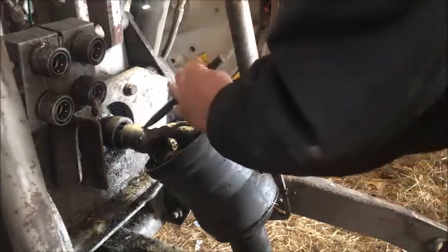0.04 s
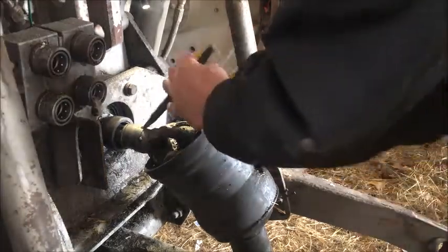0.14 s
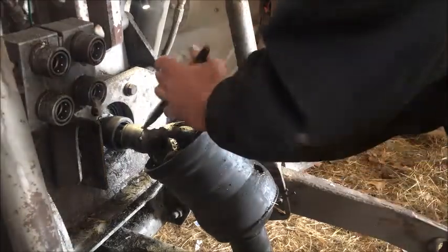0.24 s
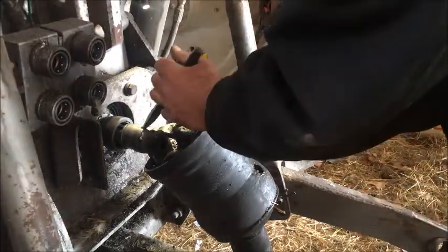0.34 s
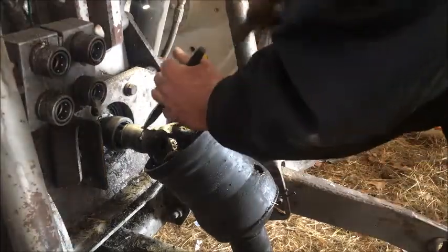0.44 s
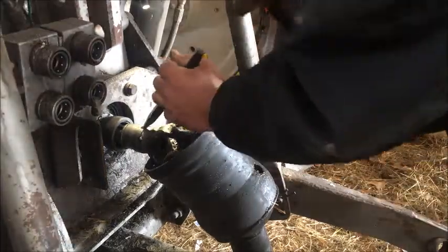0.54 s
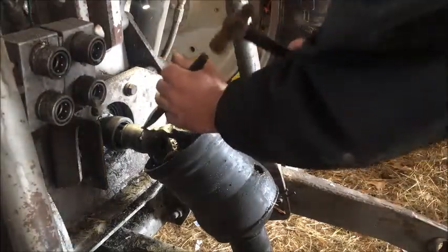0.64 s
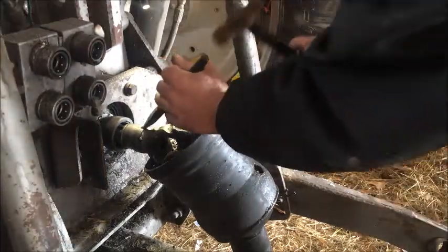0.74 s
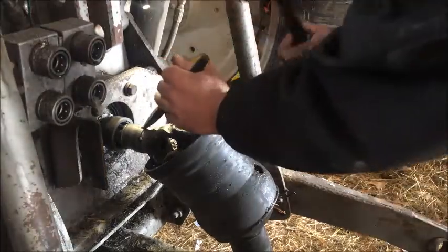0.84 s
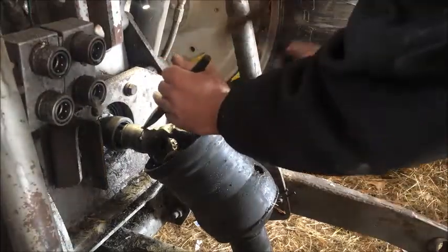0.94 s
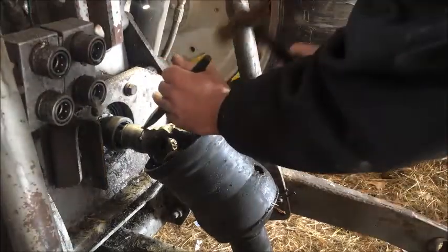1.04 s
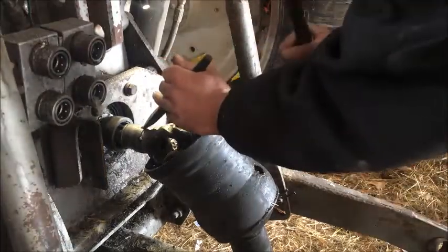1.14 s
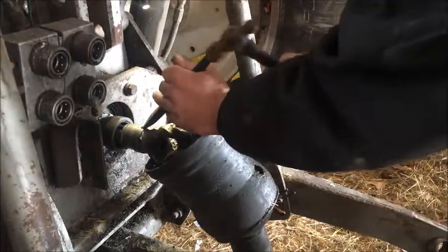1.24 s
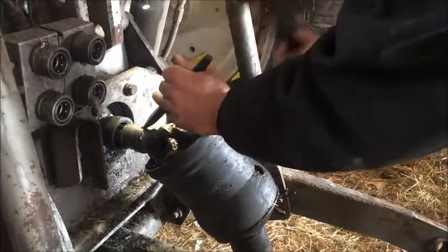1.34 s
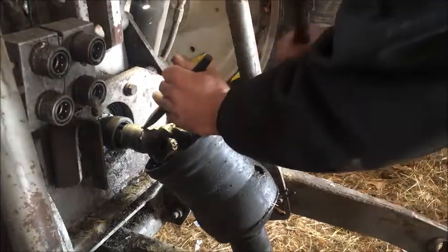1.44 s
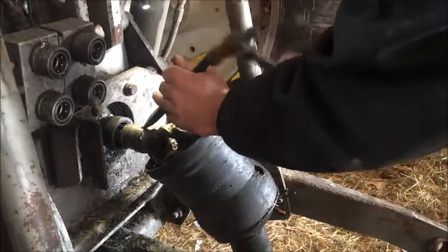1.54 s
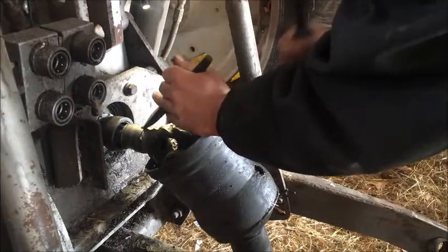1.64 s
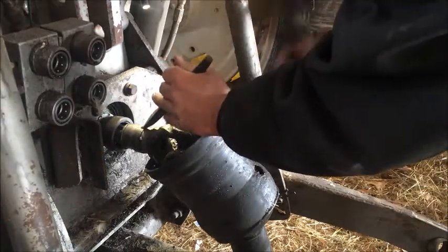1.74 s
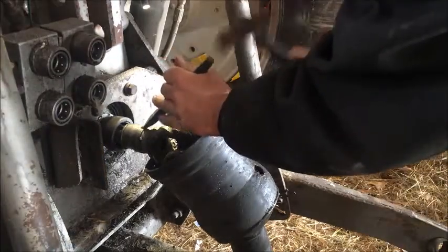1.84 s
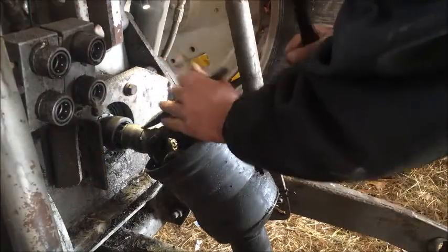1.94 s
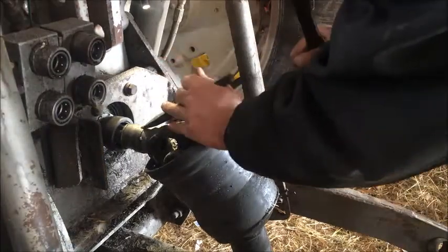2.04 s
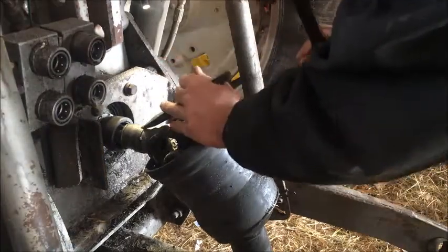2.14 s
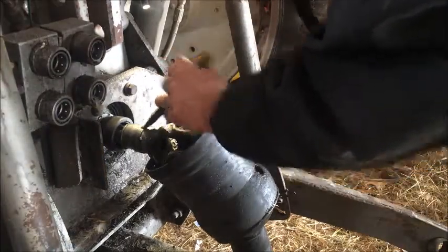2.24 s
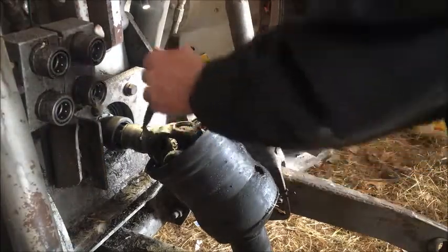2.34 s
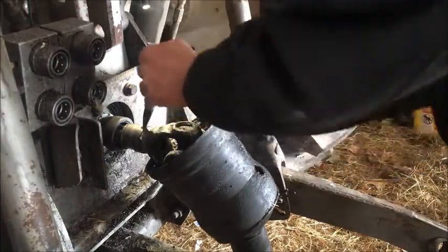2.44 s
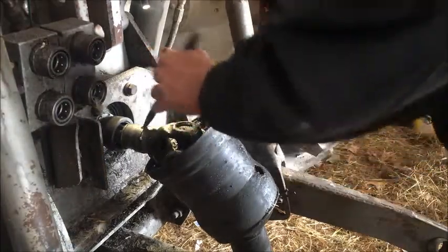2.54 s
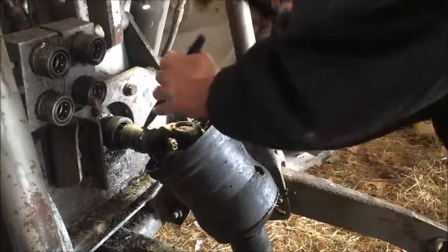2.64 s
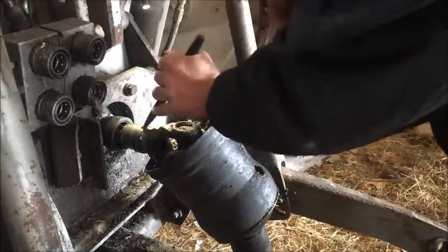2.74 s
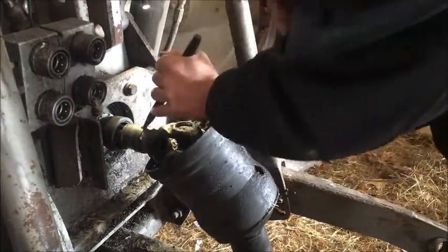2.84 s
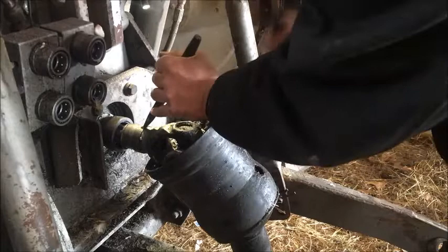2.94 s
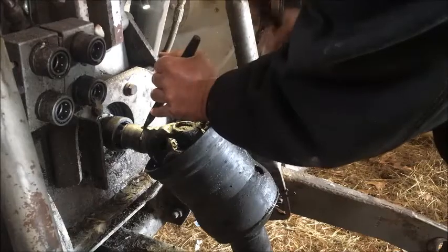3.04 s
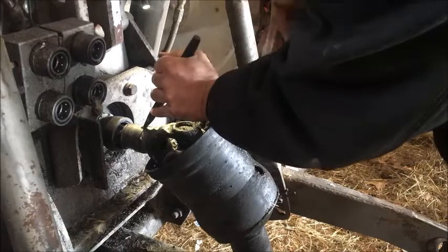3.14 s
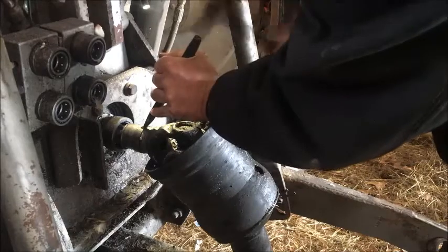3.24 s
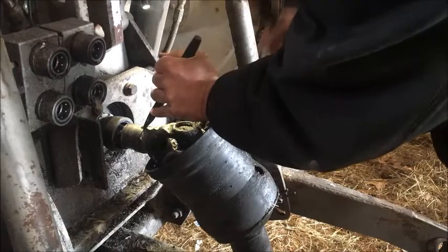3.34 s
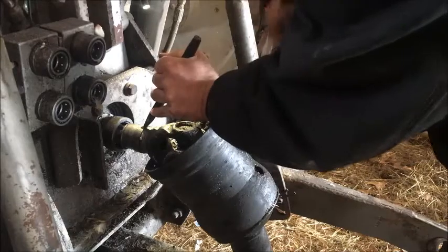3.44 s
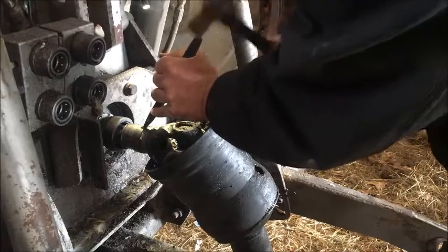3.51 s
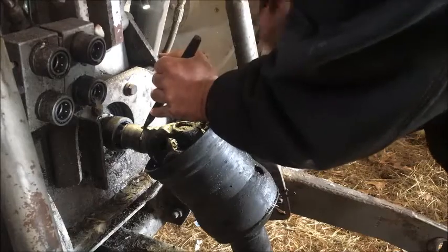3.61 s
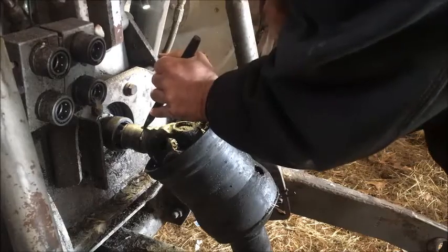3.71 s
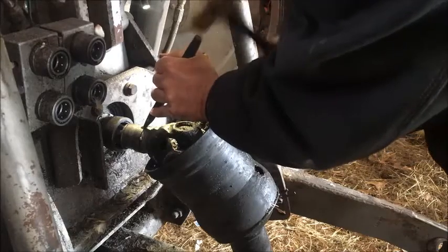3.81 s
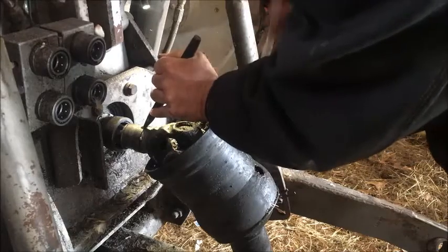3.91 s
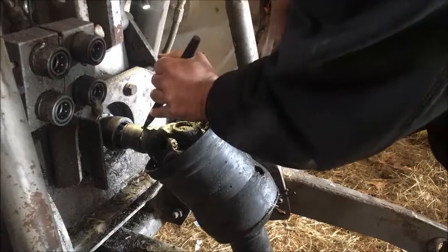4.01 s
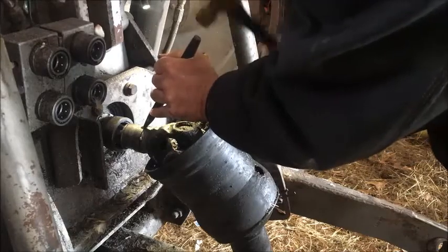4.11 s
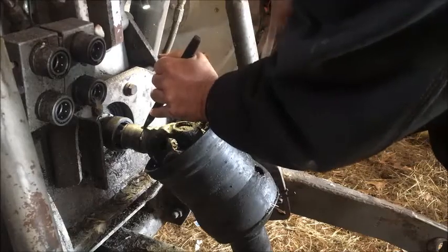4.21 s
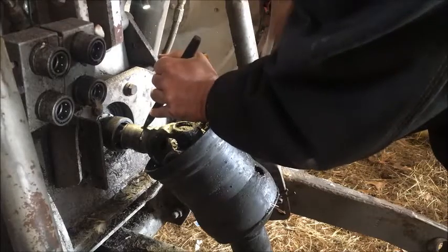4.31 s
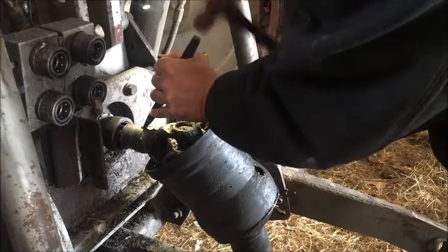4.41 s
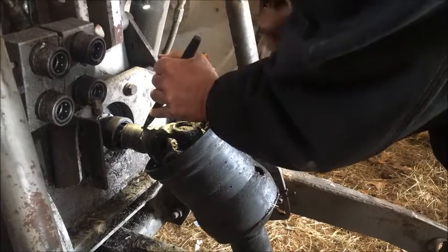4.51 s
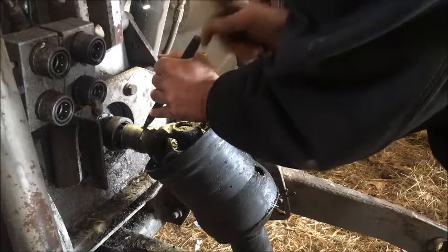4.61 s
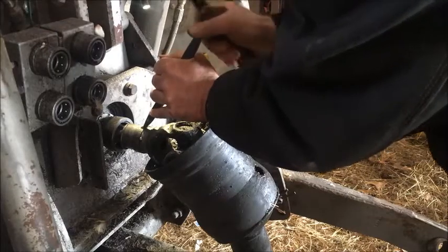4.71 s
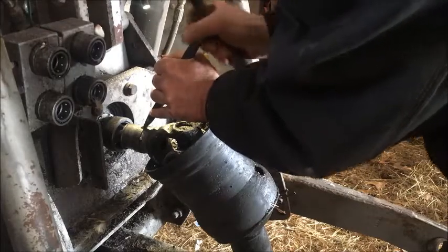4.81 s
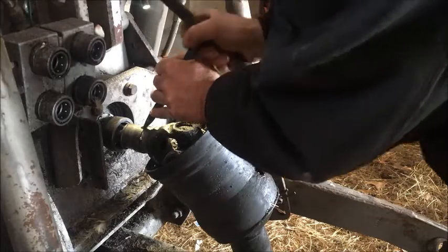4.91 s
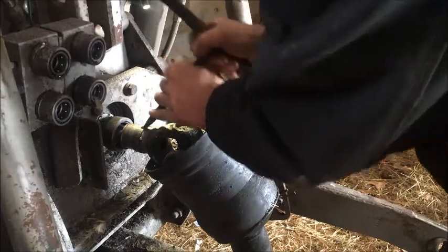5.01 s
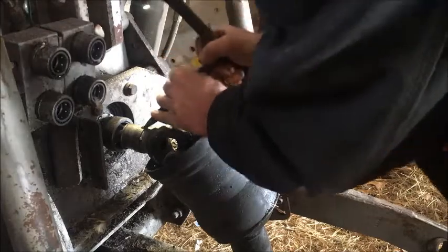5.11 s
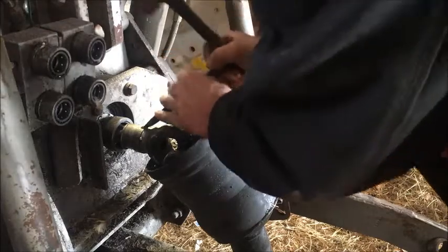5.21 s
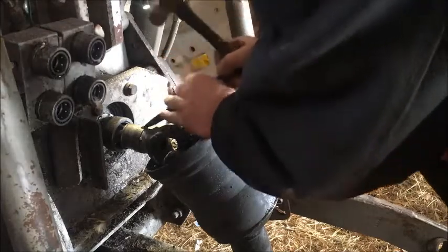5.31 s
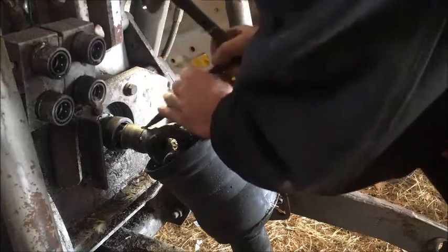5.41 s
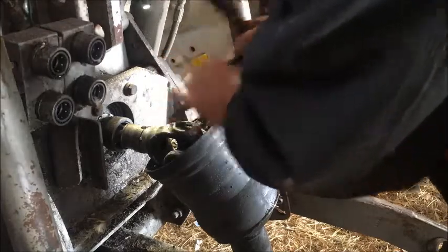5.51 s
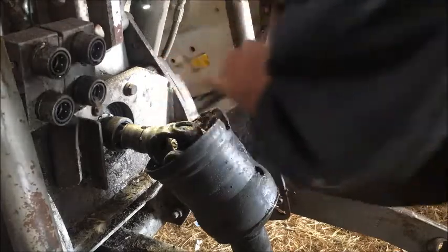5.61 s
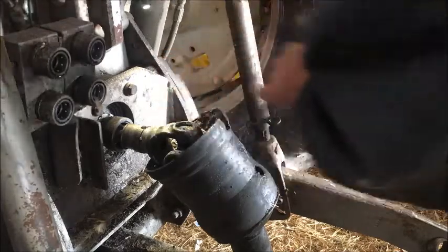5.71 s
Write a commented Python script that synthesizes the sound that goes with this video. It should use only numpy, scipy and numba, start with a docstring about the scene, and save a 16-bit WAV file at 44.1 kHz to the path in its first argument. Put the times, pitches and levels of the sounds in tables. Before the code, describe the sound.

A hammer strikes a chisel against a steel collar in two quick runs of sharp, ringing blows over a low idling engine.

```python
"""Hammer and chisel on a drive shaft

A hammer drives a hand-held chisel against the shaft's steel collar: four blows, a reseat, six more.
Each blow cracks, rings chisel and shaft, and dies away in the machine frame and the shed; it overloads
the microphone and ducks its gain. An engine idles, a sleeve rustles, the tools clink as they lift away."""
import sys
import numpy as np
from scipy import signal
from scipy.fft import rfft, irfft
from scipy.io import wavfile
from scipy.ndimage import uniform_filter1d
from numba import njit

SR = 44100
rng = np.random.default_rng(int(sys.argv[2]) if len(sys.argv) > 2 else 0)


def dump(signal):
    """Clip the signal to [-1, 1] and save it as 16-bit WAV at the path in sys.argv[1]."""
    limited = np.clip(np.atleast_2d(signal).T, -1, 1)
    pcm = np.round(limited * 32767).astype(np.int16)
    wavfile.write(sys.argv[1], SR, pcm)


N = 254009
TIME_S = np.arange(N) / SR
AGE_S = TIME_S[:SR * 3 // 4]  # since an impact

# exhaust note: (multiple of firing rate, level [dB])
EXHAUST_PARTIALS = [(1, 4), (1.5, -19), (2, -3.5), (2.5, -24), (3, -12.5), (4, -39.5), (5, -17.5)]
# engine rumble and mechanical noise: (frequency [Hz], level [dB])
RUMBLE_SPECTRUM = [(20, -47), (40, -17), (62, -0.5), (110, -3.5), (190, -12.5), (310, -22), (680, -26.5),
                   (850, -24), (1550, -27), (2200, -23), (2900, -35.5), (4700, -41.5), (8000, -42.5),
                   (16000, -41)]
# engine hiss: (frequency [Hz], level [dB])
HISS_SPECTRUM = [(4700, -52), (5250, -4), (5550, -5.5), (6200, -8), (7300, -25), (9000, -48)]
# sleeve strokes: (start [s], length [s], level [dB])
SLEEVE_STROKES = [(0.0, 1.9, -55), (0.195, 0.41, -50.5), (0.284, 0.042, -47.5), (0.755, 0.2, -49.5),
                  (2.244, 0.057, -55), (2.446, 0.08, -51.5), (2.56, 0.12, -53), (2.644, 0.3, -64),
                  (4.641, 0.12, -46), (4.777, 0.33, -55), (5.061, 0.095, -46.5), (5.236, 0.13, -55),
                  (5.503, 0.45, -45)]
# cloth friction: (frequency [Hz], level [dB])
CLOTH_SPECTRUM = [(300, 6), (1500, -3.5), (3500, -3.5), (6500, -3), (7800, -6), (9300, 1), (10400, -10.5),
                  (11500, -2.5), (16000, -4.5)]
# blows: (time [s], force [dB], chisel ring [dB], contact [s], tip spot on collar [0-2])
HAMMER_BLOWS = [(1.0483, -3.5, -2, 0.0038, 0.35), (1.3100, -2, -0.5, 0.012, 0.7),
                (1.5813, 0, -2, 0.017, 1.1), (1.8540, 1.5, 0, 0.013, 0.96),
                (3.0575, -2.5, -3.5, 0.0027, 1.9), (3.3320, 2, -11.5, 0.0069, 2.2),
                (3.5850, 1.5, 0.5, 0.01, 1.65), (3.8798, 1.5, -1, 0.0077, 2.6),
                (4.1638, 2.5, -4, 0.01, 2.3), (4.4446, 2, -3, 0.0043, 2.6)]
# chisel and collar: (frequency [Hz], spot 0 [dB], spot 1 [dB], spot 2 [dB], t60 [s], hand damping [dB])
CHISEL_MODES = [(2947, -31, -30, -27, .2, -14), (3095, -31, -25, -20, .3, -15),
                (3190, -21, -26, -28, .33, -13), (3287, -31, -29, -23, .25, -13),
                (3420, -23, -24, -28, .12, -15), (3502, -23, -16, -32, .16, -17),
                (3647, -29, -29, -32, .15, -15), (3957, -36, -37, -28, .2, -14),
                (4810, -29, -29, -42, .15, -14), (5857, -32, -33, -26, .2, -14),
                (6317, -22, -23, -30, .15, -15), (6452, -23, -22, -33, .18, -14),
                (6543, -25, -26, -31, .1, -15), (6783, -29, -23, -33, .18, -14),
                (7152, -33, -31, -32, .2, -12), (10928, -38, -34, -29, .18, -12),
                (11765, -28, -27, -19, .24, -13), (12659, -32, -26, -20, .25, -15),
                (14560, -22, -38, -33, .27, -7), (15534, -44, -33, -40, .12, -14)]
# shaft and guard: (frequency [Hz], level [dB], t60 [s])
SHAFT_MODES = [(137, -28, .25), (210, -39, .2), (342, -41, .18), (377, -37, .18), (425, -37, .15),
               (503, -28, .15), (624, -40, .11), (668, -31, .12), (719, -29, .12), (904, -28, .09),
               (947, -25, .1), (1007, -26, .08), (1101, -22, .09), (1198, -27, .08), (1381, -23, .09),
               (1418, -26, .08), (1513, -23, .09), (1628, -31, .1), (1744, -29, .1), (2226, -28, .1),
               (2471, -27, .1), (2624, -29, .1)]
# contact crack and clatter: (frequency [Hz], level [dB])
CRACK_SPECTRUM = [(100, -36), (300, -18), (900, -2.5), (2000, -5), (3200, 2.5), (5000, -3), (6700, 2),
                  (8000, -7), (12000, -1.5), (13500, -10.5), (16000, -4.5)]
# reverberation of frame and shed: (frequency [Hz], level [dB], t60 [s])
ROOM_BANDS = [(60, -29, 0.36), (133, 8, 0.26), (363, 3.5, 0.3), (990, -0.5, 0.41), (2175, 6, 0.23),
              (3150, 2.5, 0.38), (5050, 0, 0.29), (7040, 4.5, 0.28), (7450, -4, 0.26), (12100, -3, 0.25),
              (15700, 7, 0.11)]
# light tool touches: (time [s], knock [dB], free ring [dB], gripped ring [dB])
TOOL_TOUCHES = [(2.4210, -28, -70, -22), (4.692, -48, -70, -23), (5.496, -51, -45, -45),
                (5.508, -42, -39, -45), (5.518, -48, -40, -45), (5.5258, -29, -36, -35),
                (5.5385, -33, -36, -35)]
# collar, lightly knocked: (frequency [Hz], level [dB], t60 [s])
KNOCK_MODES = [(930, -1, 0.045), (1180, -12, 0.083), (1280, -4, 0.027), (2170, -16, 0.1),
               (2880, -6.5, 0.043), (3900, -15, .03), (5030, -9, 0.03), (5900, -11, 0.039)]
# chisel ringing free: (frequency [Hz], level [dB], t60 [s])
FREE_MODES = [(4960, -4, 0.038), (8950, 1, 0.08), (13200, -6, 0.15), (15100, -14, .1)]
# tip dragging on collar: (frequency [Hz], level [dB])
RASP_SPECTRUM = [(500, -20), (1000, -6), (2000, 5), (3800, -11), (5200, 5), (6300, 0), (7500, -10),
                 (16000, -7)]


def amp(db):
    """Decibels to gain."""
    return 10 ** (np.asarray(db) / 20)


def unit(x):
    """Scale to rms 1."""
    return x / np.sqrt(np.mean(x ** 2))


def fade(t60_s):
    """Exponential decay after an impact."""
    return np.exp(-np.log(1000) * AGE_S / t60_s)


def add(out, start_s, x):
    """Mix x into out."""
    i = int(start_s * SR)
    out[i:i + len(x)] += x[:N - i]


def on_log_axis(hz, points_hz, values):
    """Interpolate over log frequency."""
    return np.interp(np.log(hz + 1), np.log(points_hz), values)


def noise(spectrum, size):
    """Shaped noise, rms 1."""
    hz = np.fft.rfftfreq(size, 1 / SR)
    gain = amp(on_log_axis(hz, *np.transpose(spectrum)))
    return unit(irfft(rfft(rng.standard_normal(size)) * gain, size))


def drift(rate_hz):
    """Smooth random drift, rms near 1.4."""
    step = int(SR / rate_hz)
    stairs = np.repeat(rng.standard_normal(N // step + 1), step)
    return 1.72 * uniform_filter1d(stairs, step)[:N]


def ring(modes, detune, build_cycles, drive=1):
    """Damped modes, building up over build_cycles; random detuning stands for the grip."""
    hz, db, t60_s = np.transpose(modes)[:, :, None]
    shift, phase = rng.standard_normal((len(modes), 2)).T[:, :, None]
    cycles = AGE_S * hz * (1 + detune * shift)
    swell = 1 - np.exp(-cycles / build_cycles)
    envelope = amp(db) * fade(t60_s) * swell * drive
    return np.sum(envelope * np.sin(2 * np.pi * (cycles + phase)), axis=0)


def engine(firing_hz=44.8, waver=0.0077):
    """Idle: wavering exhaust partials, rumble throbbing with the firings, thin hiss."""
    firings = np.cumsum(firing_hz * (1 + waver * drift(10))) / SR
    exhaust = np.zeros(N)
    for multiple, db in EXHAUST_PARTIALS:
        flutter_db = (0.96 + 0.4 * multiple) * drift(11)
        exhaust += amp(db + flutter_db) * np.cos(2 * np.pi * multiple * firings)
    throb = 1 + 0.086 * np.cos(2 * np.pi * firings)
    rumble = noise(RUMBLE_SPECTRUM, N) * throb * amp(1.55 * drift(5.3))
    hiss = noise(HISS_SPECTRUM, N) * amp(0.5 * drift(7.94))
    return amp(-34) * unit(exhaust) + amp(-40.5) * rumble + amp(-60) * hiss


def sleeve():
    """Cloth slides as the arm shifts: strokes swell and die, fibres catch in uneven grains."""
    power = np.zeros(N)
    for start_s, length_s, db in SLEEVE_STROKES:
        progress = np.clip((TIME_S - start_s) / length_s, 0, 1)
        speed = np.abs(np.sin(np.pi * progress))
        power += (amp(db) * speed ** 0.64) ** 2
    grains = amp(drift(250))
    return noise(CLOTH_SPECTRUM, N) * np.sqrt(power) * grains


def chisel_ring(spot, contact_s, settle_s=0.008):
    """The tip's spot weights the modes: full drive while it chatters, then the hand damps them."""
    hz, *spot_db, t60_s, grip_db = np.transpose(CHISEL_MODES)
    mode_db = [np.interp(spot, np.arange(3), levels) for levels in np.transpose(spot_db)]
    chatter = np.exp(-np.maximum(AGE_S - contact_s, 0) / settle_s)
    damped = amp(grip_db[:, None])
    drive = damped + (1 - damped) * chatter
    return amp(7.5) * ring(np.c_[hz, mode_db, t60_s], detune=0.0012, build_cycles=6, drive=drive)


def room_response(build_s=0.0039):
    """Dense reflections in frame and shed, each band with its own decay; energy 1."""
    hz = np.fft.rfftfreq(len(AGE_S), 1 / SR)
    centres_hz, levels_db, t60s_s = np.transpose(ROOM_BANDS)
    white = rfft(rng.standard_normal(len(AGE_S)))
    tail = np.zeros(len(AGE_S))
    for share, db, t60_s in zip(np.eye(len(ROOM_BANDS)), levels_db, t60s_s):
        band = irfft(white * on_log_axis(hz, centres_hz, share), len(AGE_S))
        tail += band * amp(db) * fade(t60_s)
    tail *= 1 - np.exp(-AGE_S / build_s)
    return tail / np.sqrt(np.sum(tail ** 2))


def hammering(first_clatter_db=-2.5, seating_db_per_blow=-0.91):
    """Blows crack, ring chisel and shaft, and excite the shed; clatter weakens as the tip bites in."""
    out = np.zeros(N)
    room = room_response()
    crack_reverb = amp(13) * room
    for blow, (time_s, force_db, ring_db, contact_s, spot) in enumerate(HAMMER_BLOWS):
        chisel = amp(ring_db) * chisel_ring(spot, contact_s)
        shaft = amp(4) * ring(SHAFT_MODES, detune=0.002, build_cycles=1.6)
        clatter = amp(first_clatter_db + seating_db_per_blow * blow) * fade(t60_s=0.078)
        crack = noise(CRACK_SPECTRUM, len(AGE_S)) * (amp(3.5) * fade(t60_s=0.0046) + clatter)
        chisel_reverb = amp(-15.5) * signal.fftconvolve(chisel, room)[:len(AGE_S)]
        add(out, time_s, amp(force_db) * (chisel + shaft + crack + crack_reverb + chisel_reverb))
    return out


def tool_clinks(tilt_db_per_octave=-7):
    """The tip knocks the collar. Gripped, the chisel clinks briefly; loose, it rings high and thin."""
    out = np.zeros(N)
    hz, spot0_db, *_, t60_s, _ = np.transpose(CHISEL_MODES)
    soft_db = spot0_db + tilt_db_per_octave * np.log2(hz / hz.min())  # soft touch: weaker high modes
    for time_s, knock_db, free_db, gripped_db in TOOL_TOUCHES:
        tick = amp(-5) * noise(CRACK_SPECTRUM, len(AGE_S)) * fade(t60_s=0.015)
        knock = ring(KNOCK_MODES, detune=0.012, build_cycles=0.49) + tick
        gripped = ring(np.c_[hz, soft_db, t60_s], detune=0.002, build_cycles=3.9) * fade(t60_s=0.14)
        free = ring(FREE_MODES, detune=0.0025, build_cycles=5.1)
        add(out, time_s, amp(knock_db) * knock + amp(gripped_db) * gripped + amp(free_db) * free)
    return out


def tip_drag(start_s=5.44, slip_s=5.53, release_s=0.012):
    """The tip rasps across the collar, pressing harder until it slips free."""
    pressure = np.interp(TIME_S, [start_s, slip_s], [0, 1])
    release = np.exp(-np.maximum(TIME_S - slip_s, 0) / release_s)
    rasp = noise(RASP_SPECTRUM, N) * amp(2.5 * drift(400))
    return amp(-49) * rasp * pressure * release


def scene():
    """All sources at one microphone."""
    return (hammering() + tip_drag() + tool_clinks() + engine() + sleeve())[None]


@njit
def duck(x, threshold, target_db, attack_s, hold_s, release_s):
    """Gain [dB]: falls toward the target above threshold, holds, recovers."""
    gain_db, db, since_peak_s = np.zeros(len(x)), 0., 1e9
    for i in range(len(x)):
        since_peak_s = 0. if abs(x[i]) > threshold else since_peak_s + 1 / SR
        if since_peak_s < hold_s:
            db += (target_db - db) / (attack_s * SR)
        else:
            db -= db / (release_s * SR)
        gain_db[i] = db
    return gain_db


def record(dry):
    """Blows overload the input, the gain control ducks a moment later, a low-pass cuts the top."""
    ceiling, reaction_s, cutoff_hz = 0.77, 0.01, 15700
    oversampled = signal.resample_poly(dry[0], 2, 1)
    clipped = signal.resample_poly(ceiling * np.tanh(oversampled / ceiling), 1, 2)
    fast_db = duck(clipped, threshold=0.24, target_db=-3.5, attack_s=0.00067, hold_s=0.15, release_s=0.011)
    # creeps lower through a run of blows
    slow_db = duck(clipped, threshold=0.4, target_db=-2.5, attack_s=0.8, hold_s=0.27, release_s=0.1)
    gain_db = np.interp(TIME_S - reaction_s, TIME_S, fast_db + slow_db)
    lowpass = signal.ellip(10, 0.2, 80, cutoff_hz, fs=SR, output="sos")
    return signal.sosfilt(lowpass, clipped * amp(gain_db))[None]


dry = scene()
out = record(dry)
dump(out)
```